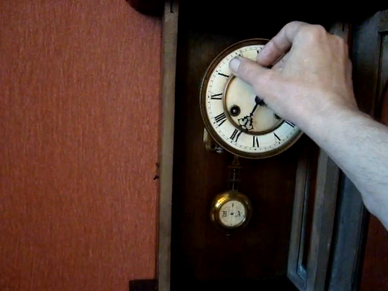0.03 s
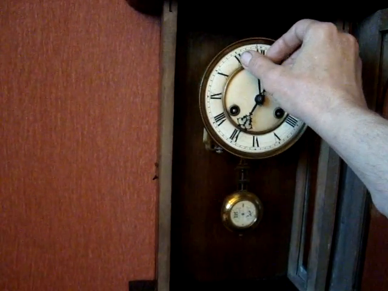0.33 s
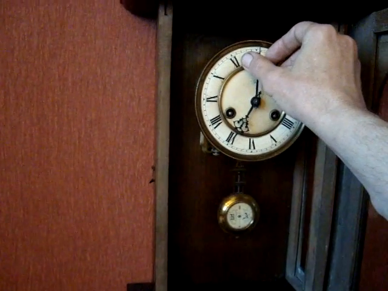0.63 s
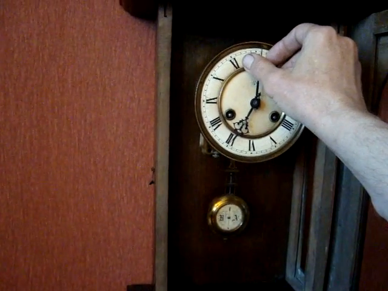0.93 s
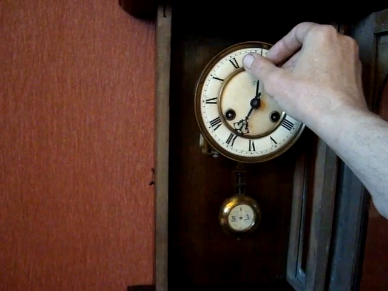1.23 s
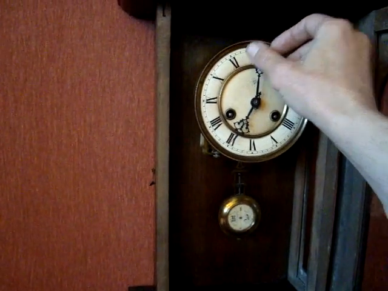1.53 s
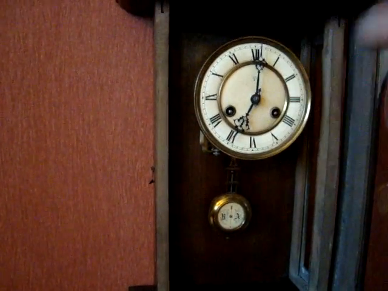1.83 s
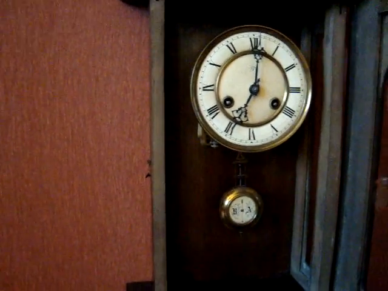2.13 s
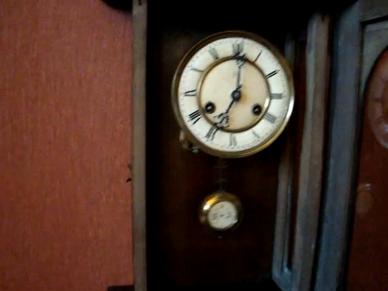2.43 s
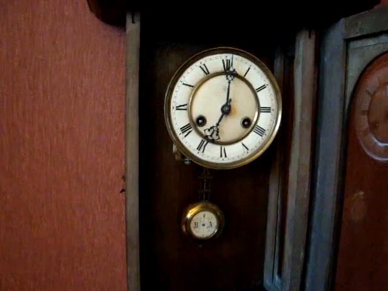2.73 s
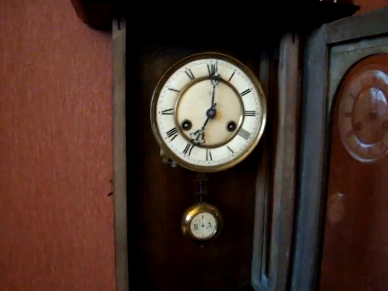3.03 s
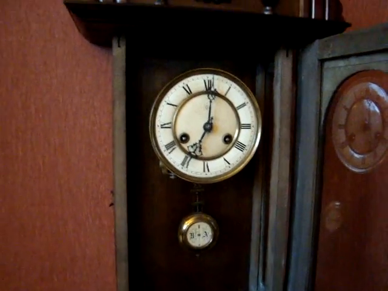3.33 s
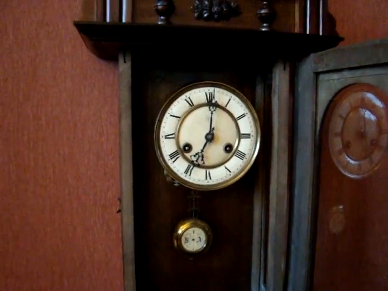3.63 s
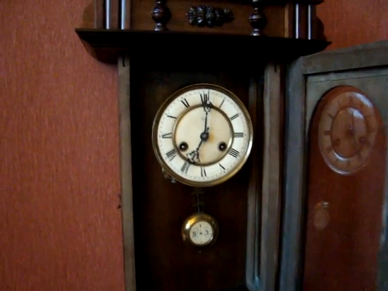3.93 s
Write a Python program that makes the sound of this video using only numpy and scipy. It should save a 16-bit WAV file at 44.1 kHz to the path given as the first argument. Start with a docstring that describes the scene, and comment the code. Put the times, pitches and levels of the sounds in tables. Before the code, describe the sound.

In a small, quiet room, a pendulum clock strikes a single time. Light brass clicks and soft finger rubs come first, then a brief whirr, and a hammer clacks on the gong, which rings on over faint ticks.

```python
"""In a small, quiet room, over soft hiss and faint hum, a hand turns the minute hand of a wooden pendulum wall
clock up to the hour. Levers click and slip in the brass movement, a spring pings, fingers rub. The strike train
is let go with a jolt and whirrs. Then the hammer knocks a coiled wire gong once: a clack of metal, a wooden
thud and a brief sizzle. The gong's paired modes beat as they ring on, over a faint wash of its weaker modes and
a few last ticks."""
import sys
import numpy as np
from scipy import signal
from scipy.fft import rfft, irfft
from scipy.io import wavfile

SR = 44100
rng = np.random.default_rng(int(sys.argv[2]) if len(sys.argv) > 2 else 0)


def materialize(psi):
    """Save the field psi as 16-bit PCM at rate SR to the path in sys.argv[1].

    A 1-D psi becomes a single channel; in a 2-D psi each row is a channel.
    """
    bounded = np.clip(np.atleast_2d(psi).T, -1, 1)
    quanta = np.round(bounded * 32767).astype(np.int16)
    wavfile.write(sys.argv[1], SR, quanta)


N = 176400
TIME = np.arange(N) / SR

# The coil's paired modes: pitch_hz, level_db, t60_s, twin_offset_hz, twin_level_db, twin_t60_s,
# twin_polarity (+1 swings with its partner, -1 against)
GONG_PAIRS = [ (291.9, -54, 5.9, 6, -64, 5, 1), (382.2, -38.5, 10, 5.1, -44, 4.8, 1),
              (483.2, -42, 8.8, 3.1, -55, 7.6, -1), (597.5, -35.5, 11, 1.15, -46, 9, 1),
              (717.6, -22.3, 3.4, 2.17, -27, 8.5, -1), (851.6, -34, 18, -3.6, -39, 2, -1),
              (988.1, -33.7, 6, 4.85, -33.7, 4.9, 1), (1146.8, -23, 2.4, -10.4, -33, .5, -1),
              (1305.8, -47.5, 12, .7, -44.5, 3.5, 1), (1474, -27, 3.8, -11.9, -45, 8.5, -1),
              (1651.4, -31, 3.8, -15, -52, 5.2, -1), (1838.5, -35, 3.6, -18.9, -41, 2.3, -1),
              (2031, -35, 5, -22.3, -43, 2.6, 1), (2233.7, -33, 1.9, -27.7, -35, 2.4, 1),
              (2444.5, -41, 3.6, -31.7, -36, .85, 1), (2663.2, -35, 2.7, -37.5, -35, .7, 1),
              (2889, -44, 2.9, -41.1, -42, .8, 1), (3122.3, -37, 2.9, -47.6, -44, .75, 1),
              (3361.3, -54, 4.5, -44, -62, .6, 1), (3607.2, -40, 1.9, -32.6, -52, .5, 1),
              (3861.1, -46, 1.3, 45, -60, .7, 1), (4390.9, -54, 1.4, -45, -66, .6, 1), ]
STRIKE_S, GONG_SWELL_S, GONG_TRIM_DB = 2.5635, 0.012, 0.09
# The coil's dense upper modes: pitch_hz, width_hz, gain_db
SIZZLE_MODES = [(2400, 810, 1), (5360, 600, -0.5), (5900, 540, 0), (7160, 650, -11)]
SIZZLE_DB, SIZZLE_T60_S = -38.5, 0.51
# The coil's dense weak modes, ringing between its main tones: pitch_hz, width_hz, gain_db
AFTERRING_MODES = [(170, 80, -26), (360, 63, -10.5), (450, 120, -12), (676, 40, 1.5), (757, 50, 2.5),
                   (1040, 370, -11), (1600, 440, -10), (2300, 800, -12), (2890, 120, -8.5),
                   (3500, 600, -20.5)]
AFTERRING_DB, AFTERRING_T60_S = -35.5, 2.9

# The hammer blow and its rattle: start_s, clack_db, thud_db
BLOWS = [(2.5565, -32, -27.5), (2.5617, -15, -27), (2.5636, -23, -20), (2.5675, -25.5, -25)]
HAMMER_RISE_S, CLACK_DECAY_S, THUD_DECAY_S = 0.00068, 0.0025, 0.0073
# Metal of the hammer and gong mount: pitch_hz, width_hz, gain_db
HAMMER_MODES = [(1650, 310, -12), (2050, 170, -5), (2770, 185, 3.5), (3850, 200, 2), (5010, 180, 4),
                (5540, 390, -1), (6180, 250, -1), (7300, 450, -10), (8700, 2200, -22)]
# Wood of the case: pitch_hz, width_hz, gain_db
CASE_MODES = [(420, 97, -14.5), (592, 110, -6), (699, 43, 5), (765, 60, -1.5), (904, 290, -10.5),
              (1060, 100, -9.5), (1550, 340, -14.5)]

# Lever clicks and escapement ticks: start_s, ring_db, snap_db, knock_db, snap_cutoff_hz
CLICKS = [ (.002, -40, -45, -50, 6040), (.012, -46, -50, -48, 5040), (.1665, -43.5, -36, -53, 5570),
          (.4272, -41, -45.5, -42.5, 8100), (.4385, -46, -46.5, -53, 9100), (.548, -48, -47, -62, 9000),
          (.5615, -38, -37, -50, 11100), (.573, -48, -56, -56, 7000), (.611, -45.5, -43, -56, 7000),
          (.6545, -44, -46, -56, 10000), (.6673, -37, -31.5, -51, 9900), (.676, -34, -38, -58, 8950),
          (.6814, -34.5, -34, -52, 10000), (.6954, -44, -47, -56, 8000), (0.715, -48, -34.5, -62, 6540),
          (0.7327, -50, -35, -58, 6500), (.8888, -39.5, -46.5, -56, 6000), (.897, -45, -49, -55, 6000),
          (1.3228, -43.5, -38.5, -45.5, 6540), (1.7985, -43, -48, -54, 4500), (1.808, -47, -56, -57, 4000),
          (2.116, -49, -48, -62, 8060), (2.221, -42.5, -49, -50.5, 5000), (2.292, -49, -49, -52, 5000),
          (3.118, -45, -45, -60, 7500), (3.425, -60, -46.5, -66, 5000), (3.572, -45, -47.5, -55, 7000),
          (3.59, -47, -58, -53, 5020), (3.959, -56, -48, -65, 7000), ]
CLICK_RISE_S, CLICK_DECAY_S, KNOCK_DECAY_S = 0.00033, 0.0051, 0.012
# Brass levers and wheels: pitch_hz, width_hz, gain_db
LEVER_MODES = [(1790, 450, -9.5), (2070, 160, 0.5), (2360, 250, -4), (2620, 130, 0), (3030, 340, -6),
               (3500, 470, -9.5), (4320, 410, -2), (4840, 420, -3), (5410, 360, -6), (6240, 360, -5),
               (7650, 250, -6.5), (8400, 290, -10.5), (9800, 590, -16.5)]
SNAP_FROM_HZ = 3200
# Harder slips that pluck a lever spring: start_s, level_db
SPRING_PLUCKS = [(0.564, -34), (.612, -45), (0.683, -31.5), (.695, -36.5)]
SPRING_HZ, SPRING_T60_S, SPRING_RISE_S = 2054, 0.13, .002
# Tone colour of the spinning strike train: pitch_hz, width_hz, gain_db
WHIRR_MODES = [(730, 200, -2), (1200, 310, 0.5), (1820, 300, -4.5), (2580, 400, -4), (4550, 900, -11),
               (6560, 1200, -16.5)]
RELEASE_S, JOLT_DB, JOLT_DECAY_S, WHIRR_DB = 2.222, -45, 0.041, -53
# Soft rubs and creaks: start_s, length_s, pitch_hz, width_hz, level_db
RUBS = [(.45, 0.16, 228, 25, -59), (.61, 0.072, 558, 25, -48), (1.084, .1, 2900, 1500, -52.5),
        (1.192, 0.083, 935, 50, -50), (1.6, 0.087, 3580, 160, -57), (1.802, 0.12, 360, 40, -53.5),
        (2.11, 0.12, 1870, 120, -51.5), (2.42, 0.13, 2600, 250, -54.5)]

# Decay of the small room: frequency_hz, t60_s
ROOM_T60 = [(200, .5), (700, 0.79), (2000, 0.47), (5000, 0.38), (10000, 0.19)]
ROOM_FADE_IN_S, HAMMER_WET_DB, MOVEMENT_WET_DB = 0.0013, -17, -12
# Tone curve of the hiss: frequency_hz, relative_db
HISS_CURVE = [(15, -63), (25, -36), (85, -25), (118, -17.5), (152, -17.5), (172, -14), (271, -10),
              (307, -3.5), (331, -7.5), (470, -6.5), (532, -7), (574, -7.5), (634, -8.5), (815, -6.5),
              (879, -8.5), (1190, -10), (1600, -14.5), (1820, -14.5), (1960, -14), (2280, -13.5),
              (3580, -19.5), (3860, -16.5), (10000, -28.5), (13000, -77.5), (22000, -120)]
HISS_DB, HIGH_CUT_HZ = -50.5, 10150
# Hum and faint tones in the air: pitch_hz, level_db, width_hz
HUM_TONES = [(306.4, -60, 1.47), (120, -77.5, 2.6), (566, -66.5, 5.4), (691, -66.5, 7), (935, -66.5, 9.3),
             (1240, -68.5, 6.1), (1852, -69, 15), (2720, -70.5, 40), (4450, -69, 25), (4530, -72, 200)]


def gong():
    """The struck coil sings: each pair of close modes rings down, beating at the rate of its offset."""
    age, out = np.maximum(TIME - STRIKE_S, 0), 0
    for hz, db, t60, offset_hz, twin_db, twin_t60, polarity in GONG_PAIRS:
        phase = rng.uniform(0, 2 * np.pi)
        pair = (hz, from_db(db), t60), (hz + offset_hz, polarity * from_db(twin_db), twin_t60)
        for mode_hz, gain, ring_s in pair:
            out = out + gain * ring_down(age, ring_s) * np.sin(2 * np.pi * mode_hz * age + phase)
    return from_db(GONG_TRIM_DB) * out * attack(age, GONG_SWELL_S)


def afterring():
    """A wash behind the gong: its dense weak modes die away, and the coil sizzles briefly."""
    age = np.maximum(TIME - STRIKE_S, 0)
    wash = ring_down(age, AFTERRING_T60_S) * body(rng.standard_normal(N), AFTERRING_MODES)
    sizzle = ring_down(age, SIZZLE_T60_S) * body(rng.standard_normal(N), SIZZLE_MODES)
    return (from_db(AFTERRING_DB) * wash + from_db(SIZZLE_DB) * sizzle) * attack(age, GONG_SWELL_S)


def hammer():
    """The hit: a hard clack of metal and a thud of the case that carries the gong."""
    starts, clack_db, thud_db = np.transpose(BLOWS)
    clack = body(contacts(starts, clack_db, HAMMER_RISE_S, CLACK_DECAY_S), HAMMER_MODES)
    thud = body(contacts(starts, thud_db, HAMMER_RISE_S, THUD_DECAY_S), CASE_MODES)
    return clack + thud


def movement():
    """Levers slip and drop: a low ring, a bright snap and a little knock in the wood."""
    starts, ring_db, snap_db, knock_db, cutoffs_hz = np.transpose(CLICKS)
    low_modes = [mode for mode in LEVER_MODES if mode[0] < SNAP_FROM_HZ]
    high_modes = [mode for mode in LEVER_MODES if mode[0] >= SNAP_FROM_HZ]
    ring = body(contacts(starts, ring_db, CLICK_RISE_S, CLICK_DECAY_S), low_modes)
    snap = body(contacts(starts, snap_db, CLICK_RISE_S, CLICK_DECAY_S, cutoffs_hz), high_modes)
    knock = body(contacts(starts, knock_db, CLICK_RISE_S, KNOCK_DECAY_S), CASE_MODES)
    return ring + snap + knock


def spring():
    """A lever spring pings on one thin note; each pluck tops up its energy."""
    energy = 0
    for start_s, db in SPRING_PLUCKS:
        age = np.maximum(TIME - start_s, 0)
        pluck = from_db(db) * attack(age, SPRING_RISE_S) * ring_down(age, SPRING_T60_S)
        energy = energy + pluck ** 2
    return np.sqrt(energy) * np.sin(2 * np.pi * SPRING_HZ * TIME)


def strike_train():
    """The freed wheels start with a rattling jolt, then settle to a faint, grainy whirr."""
    age = np.maximum(TIME - RELEASE_S, 0)
    envelope = (age > 0) * (from_db(JOLT_DB) * np.exp(-age / JOLT_DECAY_S) + from_db(WHIRR_DB))
    teeth = rms_one(rng.standard_normal(N) * rng.exponential(1, N))
    return envelope * body(teeth, WHIRR_MODES)


def rubs():
    """Fingers, clock hand and arbor rub: each stroke of friction swells and fades in one resonance."""
    out = 0
    for start_s, length_s, hz, width_hz, db in RUBS:
        swell = np.sin(np.pi * np.clip((TIME - start_s) / length_s, 0, 1))
        out = out + from_db(db) * swell * rms_one(resonate(rng.standard_normal(N), hz, width_hz))
    return out


def room(x, wet_db):
    """The small room adds a diffuse tail that dies faster in the treble."""
    age, tail = TIME[:SR], 0
    edges_hz = np.geomspace(100, 12800, 11)
    for low, high in zip(edges_hz, edges_hz[1:]):
        bandpass = signal.butter(2, [low, high], "band", fs=SR, output="sos")
        band = signal.sosfilt(bandpass, rng.standard_normal(SR))
        tail = tail + band * ring_down(age, at_hz(ROOM_T60, np.sqrt(low * high)))
    tail = tail * attack(age, ROOM_FADE_IN_S)
    return x + from_db(wet_db) * signal.fftconvolve(x, tail / np.sqrt(np.sum(tail ** 2)))[:N]


def room_tone():
    """The bed: steady hiss with a wavering hum and a few faint narrow tones."""
    hz = np.arange(N // 2 + 1) * SR / N
    hiss = irfft(rfft(rng.standard_normal(N)) * from_db(at_hz(HISS_CURVE, hz)), N)
    out = from_db(HISS_DB) * rms_one(hiss)
    for tone_hz, db, width_hz in HUM_TONES:
        phase_drift = np.cumsum(rng.standard_normal(N)) * np.sqrt(2 * np.pi * width_hz / SR)
        out = out + from_db(db) * np.sqrt(2) * np.sin(2 * np.pi * tone_hz * TIME + phase_drift)
    return out


def contacts(starts_s, levels_db, rise_s, decay_s, cutoffs_hz=None):
    """Each contact is a short, dying burst of chatter, dulled above its cutoff if it has one."""
    force, age = np.zeros(N), TIME[:SR // 10]
    envelope = attack(age, rise_s) * np.exp(-age / decay_s)
    for k, (start_s, db) in enumerate(zip(starts_s, levels_db)):
        start = int(start_s * SR)
        burst = 2 * from_db(db) * envelope * rng.choice([-1, 1], len(age))
        if cutoffs_hz is not None:
            burst = signal.lfilter(*signal.butter(3, cutoffs_hz[k], fs=SR), burst)
        force[start:start + len(age)] += burst[:N - start]
    return force


def body(x, modes):
    """Parallel resonances of alternating polarity; white noise keeps about its level."""
    power = sum(from_db(db) ** 2 * np.pi * width / SR for _, width, db in modes)
    rings = ((-1) ** k * from_db(db) * resonate(x, hz, width) for k, (hz, width, db) in enumerate(modes))
    return sum(rings) / np.sqrt(power)


def resonate(x, hz, width_hz):
    """One resonance with unity gain at its peak."""
    radius = np.exp(-np.pi * width_hz / SR)
    feedback = [1, -2 * radius * np.cos(2 * np.pi * hz / SR), radius ** 2]
    return signal.lfilter(np.array([1, 0, -1]) * (1 - radius ** 2) / 2, feedback, x + 1e-18)


def attack(age, rise_s):
    """An envelope that eases up from silence to full level."""
    return 1 - np.exp(-age / rise_s)


def ring_down(age, t60_s):
    """An envelope that falls 60 dB in t60_s."""
    return np.exp(-np.log(1000) * age / t60_s)


def at_hz(curve, hz):
    """Read a curve on a log-frequency axis."""
    points_hz, values = np.transpose(curve)
    return np.interp(np.log(np.maximum(hz, 1)), np.log(points_hz), values)


def from_db(db):
    """Decibels to gain."""
    return 10 ** (np.asarray(db) / 20)


def rms_one(x):
    """Scale to unit rms."""
    return x / np.sqrt(np.mean(x ** 2) + 1e-20)


def scene():
    """The mono mix: clockwork and chime over room tone, with reverb on the mechanism and hammer."""
    works = room(movement() + spring() + strike_train(), MOVEMENT_WET_DB) + rubs()
    chime = room(hammer(), HAMMER_WET_DB) + gong() + afterring()
    return (works + chime + room_tone())[None]


def record(dry):
    """A steep high cut takes the air off the top."""
    return signal.sosfilt(signal.ellip(12, .1, 80, HIGH_CUT_HZ, fs=SR, output="sos"), dry)


dry = scene()
out = record(dry)
materialize(out)
```